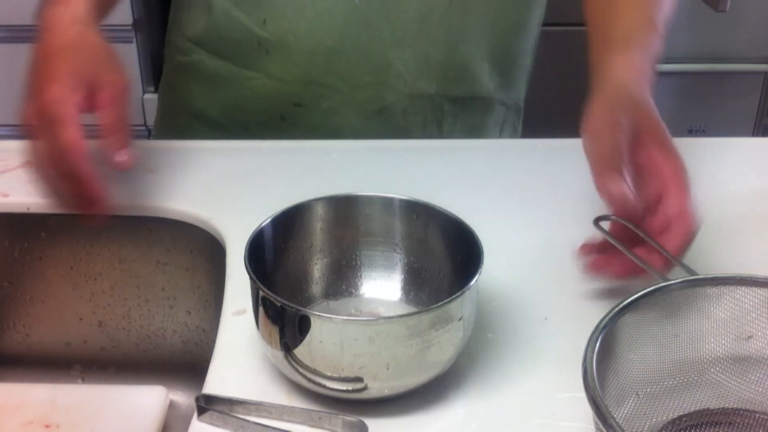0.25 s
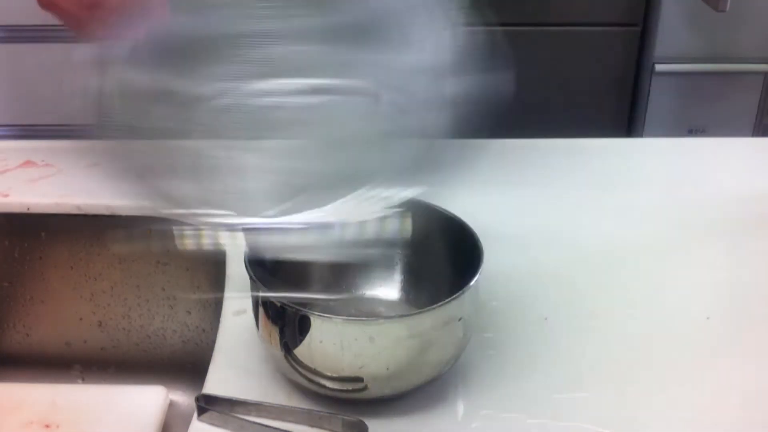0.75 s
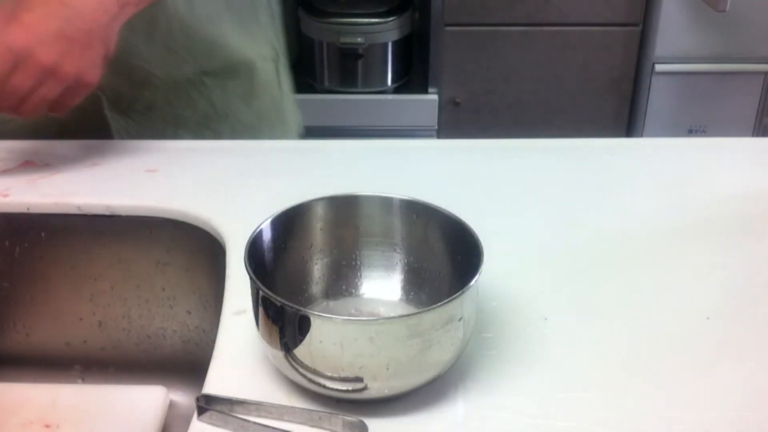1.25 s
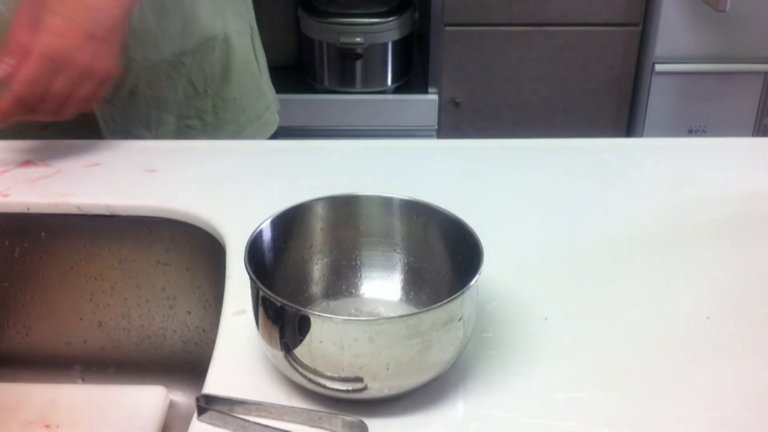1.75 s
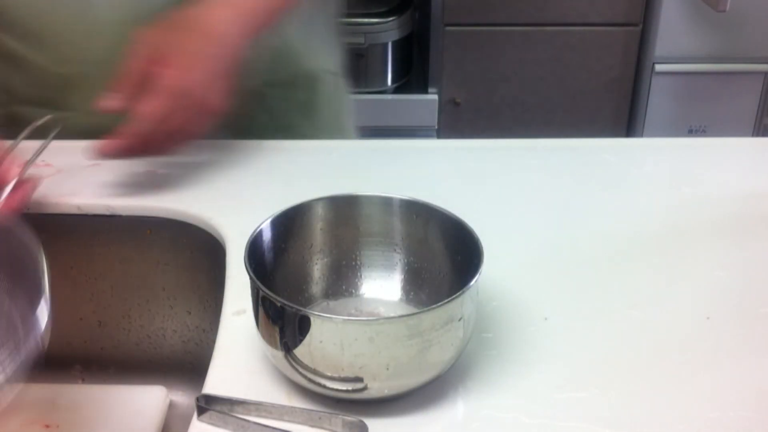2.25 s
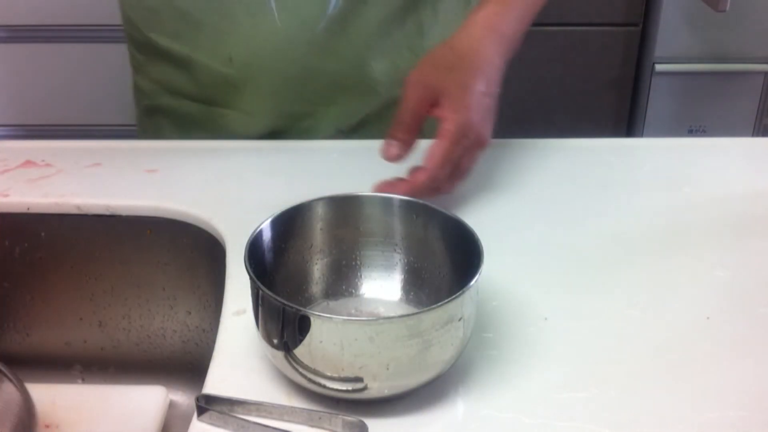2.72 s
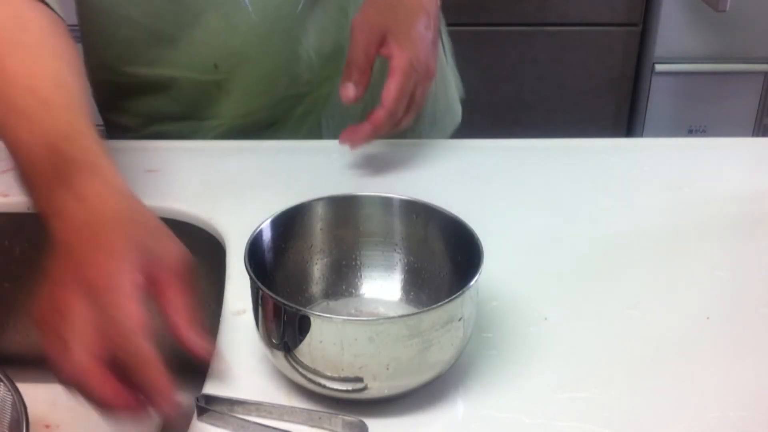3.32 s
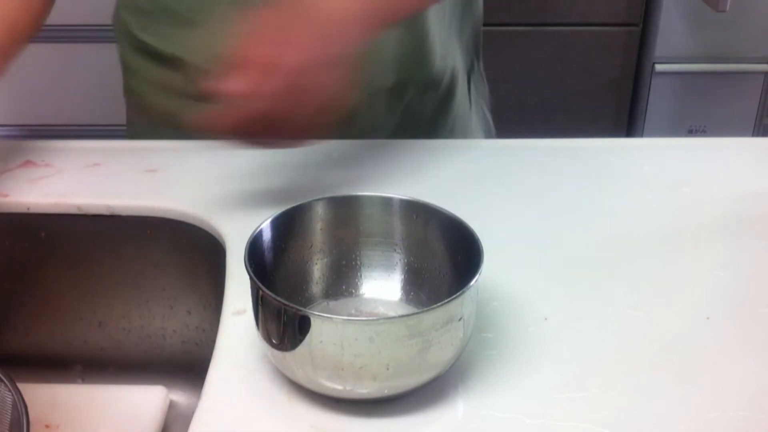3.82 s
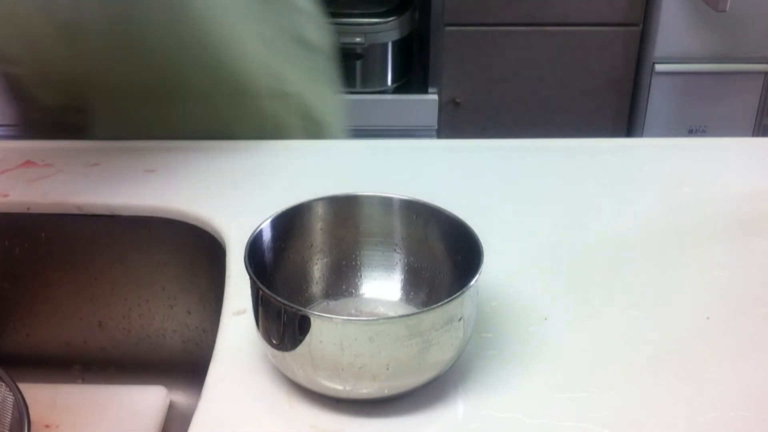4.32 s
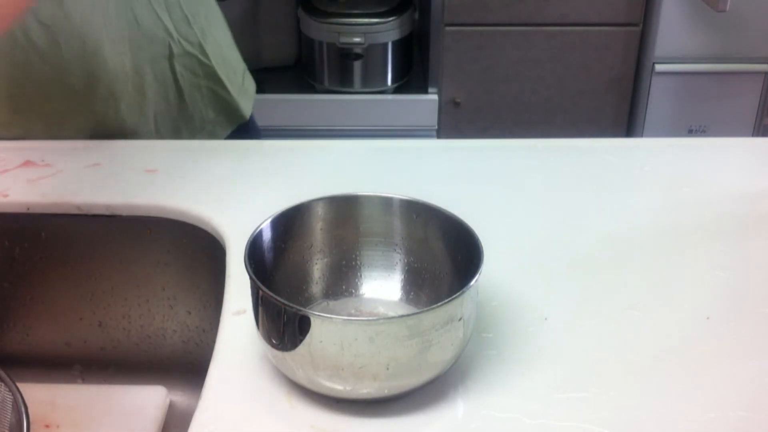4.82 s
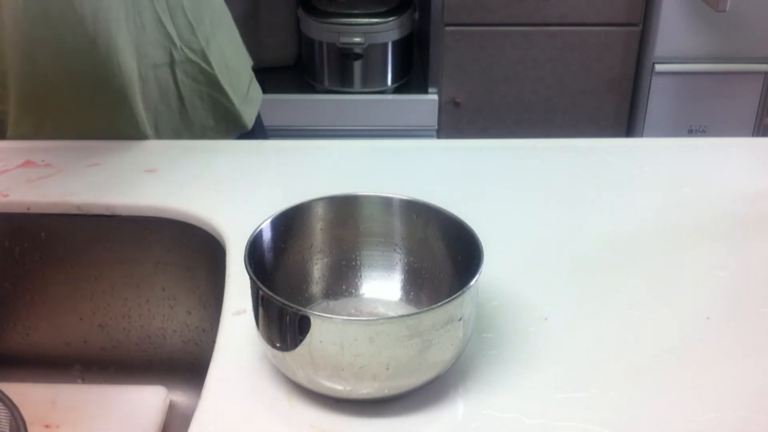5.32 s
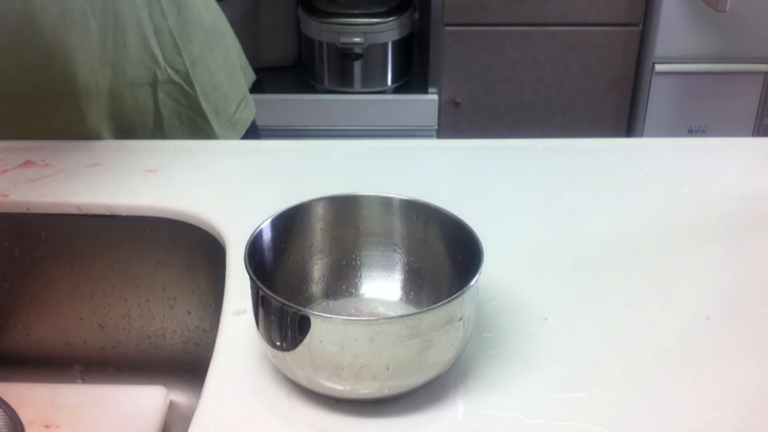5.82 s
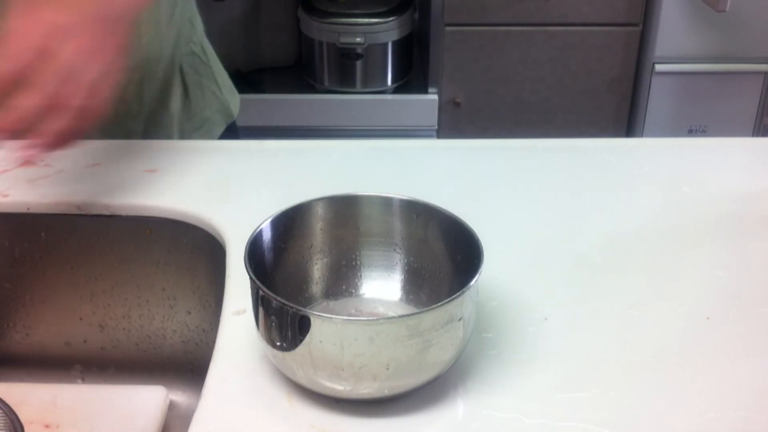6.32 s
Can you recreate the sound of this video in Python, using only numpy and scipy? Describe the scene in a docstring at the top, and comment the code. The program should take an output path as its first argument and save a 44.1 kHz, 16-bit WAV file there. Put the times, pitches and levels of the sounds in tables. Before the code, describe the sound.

Heard from nearby in a small kitchen with a short echo, a quiet appliance hum is broken by a wire strainer clattering into a steel sink, with hollow booms beneath. A brief scrape and clap of metal tongs follows. Tap water then sprays onto the basin for under two seconds, mixed with sharp metal knocks and thuds, before it weakens and the last water runs off.

```python
"""Appliances hum and breathe in a small, hard kitchen, under a few faint tinks.
A wire strainer clacks down in a stainless steel sink and rocks to rest, the basin booming beneath it.
Steel tongs scrape off the counter and their arms clap together.
The tap opens: its spray hisses, splashes and drums on the basin while things are knocked about
under it. Then it dribbles out, and the last water runs off among a few light knocks."""
import sys
import numpy as np
from scipy import signal
from scipy.fft import rfft, irfft, next_fast_len
from scipy.io import wavfile
from scipy.ndimage import uniform_filter1d, map_coordinates

SR = 44100
rng = np.random.default_rng(int(sys.argv[2]) if len(sys.argv) > 2 else 0)


def persist_wave(psi):
    """Save psi, clipped to +-1, as 16-bit WAV."""
    counts = np.round(np.clip(psi, -1, 1) * 32767).astype(np.int16)
    wavfile.write(sys.argv[1], SR, np.atleast_2d(counts).T)


N = 289296
TAP_OPENS_S = 4.68

# The modes of the basin's sheet steel. Each row: pitch in Hz, level in dB, t60 in seconds.
BASIN_MODES = [(101, -8.5, 0.25), (151.4, -0.5, 0.48), (190.6, -6.5, 0.57), (233.5, -1.5, 0.33),
               (268, -4.5, 0.36), (323, 0.5, 0.37), (403.3, -0.5, 0.45), (459, -3.5, 0.35),
               (554.7, -3.5, 0.3), (628.5, 1.5, 0.18), (688.5, -2.5, 0.2), (832, -15, 0.32),
               (905, -12, 0.37), (943.5, -4, 0.3), (1146, -9.5, 0.32), (1470, -6, 0.35)]


def amp(db):
    """Decibels to gain."""
    return 10 ** (np.asarray(db) / 20)


def unit(x):
    """Scale to rms 1."""
    return x / np.sqrt(np.mean(x ** 2) + 1e-20)


def along(points, hz):
    """Read (Hz, value) points on a log axis."""
    pitches, values = np.transpose(points)
    return np.interp(np.log(hz + 1), np.log(pitches + 1), values)


def wobble(rate):
    """A smooth random curve, rate knots a second."""
    knots = rng.standard_normal(int(N * rate / SR) + 4)
    return map_coordinates(knots, [np.arange(N) * rate / SR])


def filtered(x, response):
    """Pass x through a response given as a function of frequency."""
    size = next_fast_len(len(x) + 8192)
    return irfft(rfft(x, size) * response(np.fft.rfftfreq(size, 1 / SR)), size)[:len(x)]


def coloured(x, spectrum):
    """Give x a spectrum, at rms 1."""
    return unit(filtered(x, lambda hz: amp(along(spectrum, hz))))


def fade(t, t60, attack):
    """A quick rise and an exponential decay, both in seconds."""
    return np.exp(-np.log(1000) * t / max(t60, .005)) * (1 - np.exp(-t / max(attack, 1e-5)))


def ring(modes, t, attack, scatter_db):
    """Damped modes, struck at new strengths each time."""
    draws = rng.standard_normal((len(modes), 2))
    return sum(amp(db + scatter_db * scatter) * np.sign(polarity)
               * np.sin(2 * np.pi * hz * t) * fade(t, t60, attack)
               for (hz, db, t60), (scatter, polarity) in zip(modes, draws))


def cluster(hz, t, spread, count=11):
    """A tight bunch of modes around one pitch, at rms 1."""
    pitches = hz * (1 + spread * np.linspace(-1, 1, count) * rng.uniform(0.484, 1, count))
    return unit(np.sin(2 * np.pi * (pitches[:, None] * t + rng.random((count, 1)))).sum(0))


def add(track, s, sound):
    """Mix a sound into the track at s seconds."""
    part = track[max(round(s * SR), 0):][:len(sound)]
    part += sound[:len(part)]


def appliances():
    """A bed of air noise and slightly wavering mains hum."""
    # The colour of the air. Each row: frequency in Hz, level in dB.
    air_spectrum = [(25, -17), (60, -25), (85, -24), (120, -2), (160, -11.5), (240, -11), (360, -9),
                    (500, -14.5), (800, -16.5), (2600, -19.5), (6000, -22), (13600, -26.5), (16000, -27)]
    # The air's slow swell. Each row: time in seconds, level in dB.
    air_levels = [(1.8, -60), (3.9, -59), (4.5, -57.5)]
    # The hum's partials. Each row: pitch in Hz, rms level in dB.
    hum_partials = [(120, -66), (240, -78), (300, -79.5)]
    t = np.arange(N) / SR
    air_db = np.interp(t, *np.transpose(air_levels)) + 0.49 * wobble(3.6)
    air = amp(air_db) * coloured(rng.standard_normal(N), air_spectrum)
    hum = sum(amp(db + 1.7 * wobble(6.6)) * np.sqrt(2) * np.sin(2 * np.pi * hz * t + 0.35 * wobble(30))
              for hz, db in hum_partials)
    return air + hum


def tinks():
    """Light touches wake only one bunch of modes: a single short note."""
    # Each row: start in seconds, relative level in dB, pitch in Hz.
    touches = [(.125, -45, 2140), (.452, -43.5, 2340), (0.546, -47, 2540), (1.214, -42.5, 2700),
               (1.653, -46, 2690), (5.903, -20, 3060), (5.918, -17, 2365), (6.4, -30, 2285),
               (6.402, -31.5, 1430)]
    out, t = np.zeros(N), np.arange(SR // 3) / SR
    for s, db, hz in touches:
        note = cluster(hz, t, spread=0.109, count=17)
        add(out, s, amp(db - 12.5) * note * fade(t, t60=0.095, attack=0.001))
    return out


def boom(t, boom_hz):
    """The wide steel panel takes a moment to get moving; its pitch depends on where it is struck."""
    # The colour of the thud. Each row: multiple of the boom's pitch, level in dB.
    thud_shape = [(.08, -52), (.25, -49), (.45, -25), (.65, 2.5), (1, 2.5), (1.5, -5.5), (2.6, -9.5),
                  (5, -40), (16, -51)]
    spectrum = np.array(thud_shape) * [boom_hz, 1]
    thud = amp(5.5) * coloured(rng.standard_normal(len(t)), spectrum) * fade(t, t60=0.17, attack=0.022)
    woken_modes = [(hz, db + .5 * along(spectrum, hz), t60) for hz, db, t60 in BASIN_MODES]
    return thud + amp(-8.5) * ring(woken_modes, t, attack=0.0016, scatter_db=3.5)


def thuds():
    """Low booms of the basin, many under a knock, a few on their own."""
    # Each row: start in seconds, level in dB, boom pitch in Hz.
    booms = [(.475, -53, 135), (2.682, -31, 154), (2.757, -28.5, 158), (2.779, -25.5, 474), (2.9, -29, 274),
             (2.975, -31.5, 121), (3.573, -42, 203), (4.529, -49, 330), (4.582, -28, 215),
             (4.632, -22, 215), (5.438, -30, 140), (5.775, -30.5, 413), (5.825, -25.5, 143),
             (6.066, -29, 143)]
    out, t = np.zeros(N), np.arange(SR) / SR
    for s, db, hz in booms:
        add(out, s, amp(db) * boom(t, hz))
    return out


def knocks():
    """Each blow clacks, snaps if the edge is hard, rings the utensil and sets the basin booming."""
    # Steel on the sink. Each row: start in seconds, strength in dB, edge hardness from 0 to 1,
    # the utensil's pitch in Hz, its ring in dB against the strength, the basin's boom in dB.
    blows = [(2.593, -17.5, 0.92, 5800, 4, -29), (2.679, -19, 0.21, 1970, 3.5, -34),
             (2.756, -25.5, .35, 886, -2.5, -33), (2.805, -23, 0.25, 1890, 4.5, -30),
             (2.883, -19, 0.52, 2410, -11, -31), (2.965, -31.5, 0.1, 2380, 4, -42),
             (3.008, -32.5, 0.81, 957, -0.5, -37), (3.036, -30, 0.66, 2460, -12, -36),
             (3.117, -38.5, 0.3, 1164, 1, -32), (4.568, -28.5, 1, 4610, 10, -28.5),
             (4.59, -35, 0.74, 1560, 6.5, -29), (4.63, -34, 0.72, 1627, 7.5, -30.5),
             (5.408, -19.5, 0.81, 4420, 4, -42), (5.422, -21, 0.62, 930, 7.5, -22.5),
             (5.449, -25, 0.79, 3820, 3.5, -36), (5.528, -33, 0.1, 920, 9, -36),
             (5.825, -23, 0.2, 1650, 4.5, -24), (5.83, -21, 1, 4950, 12.5, -25),
             (5.991, -19, 0.26, 2490, -1, -34.5), (6.037, -23.5, 0.33, 2370, -6, -36),
             (6.074, -35.5, 0.81, 1010, -6, -33.5), (6.455, -39, 0.84, 4500, 0, -44),
             (6.495, -28.5, 0.9, 1240, 1.5, -33.5), (6.508, -25.5, 0.84, 1450, -1, -38)]
    # The dull clack and the bright snap. Each row: frequency in Hz, level in dB.
    clack_spectrum = [(30, -59), (100, -13), (500, -7), (1000, -4.5), (1300, -3.5), (1900, -4),
                      (2700, -3.5), (3800, -14), (6000, -24.5), (15000, -86)]
    snap_spectrum = [(50, -55), (1500, -78), (2400, -20.5), (3200, 1.5), (4000, -4.5), (4700, -3.5),
                     (5700, 0), (6900, -4.5), (8000, -3), (10000, -7), (12000, -11), (16000, -20)]
    contact_t60_s, floor_hz = 0.079, 365  # the blows land on the basin's floor
    out, t = np.zeros(N), np.arange(SR) / SR
    for s, db, hardness, ring_hz, ring_db, boom_db in blows:
        clack_noise, snap_noise = rng.standard_normal((2, len(t)))
        clack = coloured(clack_noise, clack_spectrum) * fade(t, contact_t60_s, attack=0.00057)
        snap = coloured(snap_noise, snap_spectrum) * fade(t, 1.15 * contact_t60_s, attack=0.002)
        # A soft edge loses the snap; a hard one trades some of the clack for it.
        contact = amp(3 - 6.5 * hardness) * clack + amp(5.5 - 41 * (1 - hardness)) * snap
        ring_t60_s = .046 * (2000 / ring_hz) ** .35  # low notes ring longer
        note = amp(ring_db) * cluster(ring_hz, t, spread=0.076) * fade(t, ring_t60_s, attack=0.0015)
        add(out, s, amp(db) * (contact + note) + amp(boom_db) * boom(t, floor_hz))
    return out


def strainer_rim():
    """The wire rim sings on faintly from its last hard bounce."""
    # Each row: pitch in Hz, level in dB, t60 in seconds.
    rim_modes = [(351, -50.5, 2.6), (2580, -50, 0.4), (4540, -47, 0.76)]
    out, t = np.zeros(N), np.arange(SR) / SR
    add(out, 2.882, ring(rim_modes, t, attack=0.0057, scatter_db=2))
    return out


def tongs():
    """Thin steel arms scrape brightly and clap together with a short ring."""
    # Each row: start in seconds, scrape level in dB, ring level in dB.
    contacts = [(3.616, -40.5, -58), (3.637, -34.5, -36.5), (3.645, -37.5, -35.5)]
    # The ring of the arms. Each row: pitch in Hz, level in dB, t60 in seconds.
    arm_modes = [(1060, -8, 0.13), (1430, -16, 0.1), (1710, -3, 0.11), (2853, -14, 0.07), (4440, -17, .07),
                 (5480, 2, 0.047), (7070, 4, 0.045), (8215, -9, 0.1), (10030, -8, .1), (11580, -3, 0.09),
                 (14100, -4, 0.07)]
    # The colour of the scrape. Each row: frequency in Hz, level in dB.
    scrape_spectrum = [(40, -40), (300, -7), (700, -11.5), (1200, 1),
                       (3000, -5.0), (7000, -8), (11500, -15.5), (15000, -16)]
    out, t = np.zeros(N), np.arange(SR // 2) / SR
    for s, scrape_db, ring_db in contacts:
        scrape = coloured(rng.standard_normal(len(t)), scrape_spectrum)
        scrape *= fade(t, t60=0.15, attack=0.00034)
        arms = ring(arm_modes, t, attack=0.00056, scatter_db=5.5)
        add(out, s, amp(scrape_db) * scrape + amp(ring_db) * arms)
    return out


def jet_db(s):
    """Strength of the jet where it lands, at s seconds."""
    # Each row: time in seconds, strength in dB.
    strengths = [(4.69, -58), (4.76, -47.5), (4.95, -46), (5.07, -47), (5.11, -38), (5.27, -38.5),
                 (5.32, -49), (5.39, -38.5), (5.92, -39), (5.99, -50.5), (6.15, -57.5), (6.56, -75)]
    return np.interp(s, *np.transpose(strengths))


def drops(rate, spread_db):
    """Random impacts of uneven size, rate a second."""
    landings = rng.random(N) < rate / SR
    return unit(landings * rng.standard_normal(N) * amp(spread_db * rng.standard_normal(N)))


def bubbles(rate, centre_hz, octaves, cycles, spread_db):
    """Tiny bubbles that ring for some cycles and rise in pitch, at rms 1."""
    start, pitch_a, pitch_b, rarity = rng.random((int(rate * N / SR), 4)).T[:, :, None]
    hz = np.clip(centre_hz * 2 ** (octaves * (pitch_a + pitch_b - 1)), 300, 15000)  # a spread of sizes
    samples = np.arange(700)
    age = hz * samples / SR / cycles
    strength = amp(-spread_db * np.log(.02 + .98 * rarity))
    rise = 1 + 0.012 * np.minimum(age, 4)
    grains = strength * np.sin(2 * np.pi * cycles * age * rise) * np.exp(-age)
    positions = (start * N).astype(int) + samples
    return unit(np.bincount(positions.ravel(), grains.ravel())[:N])


def patchy(x, depth_db):
    """Let patches of the spectrum swell and sink for some tens of milliseconds."""
    spectra = signal.stft(x, nperseg=256)[2]
    patches = uniform_filter1d(rng.standard_normal(spectra.shape), size=5, axis=0)
    patches = uniform_filter1d(patches, size=7, axis=1)
    return unit(signal.istft(spectra * amp(depth_db * unit(patches)), nperseg=256)[1][:len(x)])


def basin_drumming():
    """Drops shake the same panel modes that the blows ring; the water film damps them."""
    # The low rattle of drops on steel. Each row: frequency in Hz, level in dB.
    rattle_spectrum = [(30, -36), (70, -25), (110, -11), (150, 9.5), (210, -0.5), (320, 4.5), (470, 4.5),
                       (680, -7), (800, -9), (950, -12), (1400, -16.5), (2500, -70)]

    def panel(f, width_hz=22):
        return sum((-1) ** k * amp(db) * 1j * f * width_hz / (hz * hz - f * f + 1j * f * width_hz)
                   for k, (hz, db, _) in enumerate(BASIN_MODES))

    patter = unit(filtered(drops(rate=2500, spread_db=1.5), panel))
    rattle = coloured(drops(rate=3000, spread_db=1.5), rattle_spectrum)
    return amp(-5) * rattle + amp(-9) * patter


def water():
    """The aerated jet hisses, breaks into drops and bubbles, and drums on the steel; then it runs off."""
    # The fine spray and the fatter splash. Each row: frequency in Hz, level in dB.
    spray_spectrum = [(1000, -45), (2500, -2), (4200, 6), (6000, 2), (9000, 1), (12000, -1.5),
                      (16000, -5.5)]
    splash_spectrum = [(300, -47), (700, -4), (1200, 6.5), (2000, 4), (3200, -4.5), (5000, 3.5), (9000, 1),
                       (16000, -9)]
    full_jet_db, valve_s = -39.5, 0.064
    runoff_s, runoff_rise_s = 6.127, 0.074
    t = np.arange(N) / SR
    force_db = jet_db(t) - full_jet_db
    valve = np.clip((t - TAP_OPENS_S) / valve_s, 0, 1)
    # As the jet stops, water left in the utensil keeps splashing while its drumming dies away.
    draining = np.maximum(t - runoff_s, 0)
    runoff_splash = amp(-49.5) * fade(draining, t60=5, attack=runoff_rise_s)
    runoff_drum = amp(-32) * fade(draining, t60=0.73, attack=runoff_rise_s)
    # The splash follows the jet's force steeply, the drumming gently.
    splash_gain = np.hypot(amp(-47 + 1.33 * force_db), runoff_splash)
    drum_gain = np.hypot(amp(-37 + 0.63 * force_db), runoff_drum)

    surge = wobble(30)
    fizz = bubbles(rate=900, centre_hz=7000, octaves=1.1, cycles=14, spread_db=4.2)
    plips = bubbles(rate=600, centre_hz=3000, octaves=1.2, cycles=7, spread_db=3.5)
    fine_drops = coloured(drops(rate=9000, spread_db=2.5), spray_spectrum)
    spray = amp(-36.5 + force_db + 0.35 * surge) * patchy(fine_drops + .5 * fizz, depth_db=2.1)
    flutter = amp(0.23 * surge + 3.2 * wobble(32))
    fat_drops = coloured(drops(rate=4400, spread_db=2.5), splash_spectrum)
    splash = splash_gain * flutter * (fat_drops + plips / np.sqrt(2))
    drum = drum_gain * basin_drumming() * amp(0.3 * wobble(2.7))
    return valve * (spray + splash + drum)


def spatters():
    """Short flurries of drops, each in its own narrow range of pitch."""
    # The jet catches an edge. Each row: start in seconds, relative level in dB, pitch in Hz.
    edge_spatters = [(5.095, -45, 4100), (5.165, -28, 3480), (5.645, -33, 3250)]
    # Smaller ones come by chance, louder under a stronger jet.
    per_second, low_hz, high_hz = 5, 3500, 7400
    running_s = N / SR - TAP_OPENS_S
    when, pitch = rng.random((int(per_second * running_s), 2)).T
    times = TAP_OPENS_S + when * running_s
    chance_spatters = list(zip(times, jet_db(times) + 2, low_hz + pitch * (high_hz - low_hz)))
    out, t = np.zeros(N), np.arange(SR // 4) / SR
    for s, db, hz in edge_spatters + chance_spatters:
        impacts = drops(rate=2900, spread_db=-3.0)[:len(t)]
        flurry = unit(filtered(impacts, lambda f: 1 / (1 + ((f - hz) / (0.19 * hz)) ** 2)))
        add(out, s, amp(db + 4.5) * flurry * fade(t, t60=0.09, attack=0.0042))
    return out


def kitchen(x):
    """Hard walls answer a few milliseconds later; the treble dies first."""
    # The room's decay. Each row: frequency in Hz, t60 in seconds.
    decay_times = [(120, 0.41), (500, 0.5), (2000, 0.31), (6000, 0.26), (15000, 0.13)]
    hz, t, spectra = signal.stft(rng.standard_normal(SR * 3 // 4), SR, nperseg=256)
    decay = np.exp(-np.log(1000) * t / along(decay_times, hz)[:, None])
    tail = signal.istft(spectra * decay, SR, nperseg=256)[1]
    tail *= 1 - np.exp(-np.arange(len(tail)) / SR / 0.0068)  # the echoes build up
    return signal.fftconvolve(x, tail / np.linalg.norm(tail))[:N]


def scene():
    """Handling noises echo in the room, the nearby tongs least; water and appliances stay dry."""
    hits = knocks() + thuds() + strainer_rim() + tinks() + spatters()
    near = tongs()
    room = amp(-10.0) * kitchen(hits + amp(-5.0) * near)
    return (hits + near + room + water() + appliances())[None]


def record(dry):
    """A small microphone thins the deep bass and keeps nothing above its band limit."""
    bass_hz, top_hz = 45, 16000

    def response(hz):
        return hz ** 2 / np.sqrt(hz ** 4 + bass_hz ** 4) / np.sqrt(1 + (hz / top_hz) ** 200)

    return np.array([filtered(x, response) for x in dry])


dry = scene()
out = record(dry)
persist_wave(out)
```